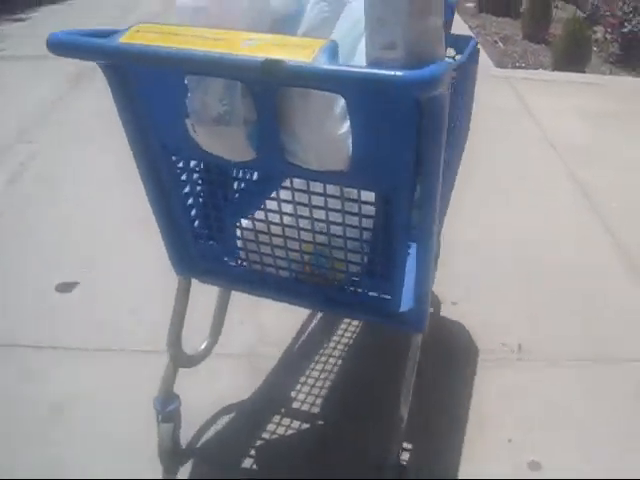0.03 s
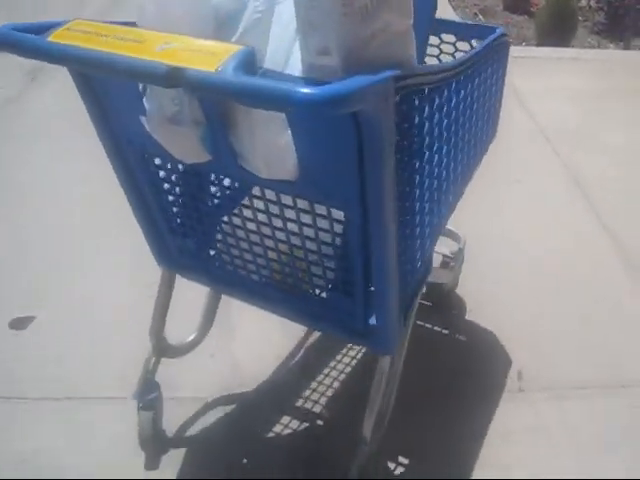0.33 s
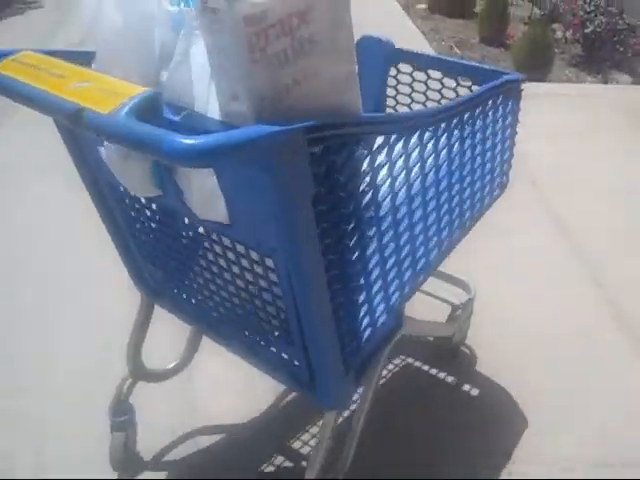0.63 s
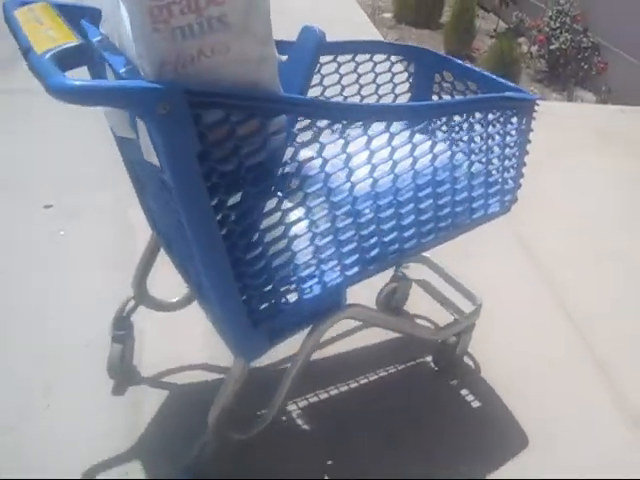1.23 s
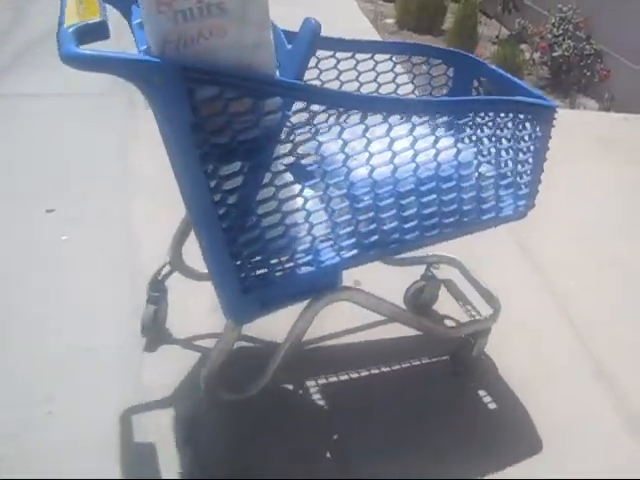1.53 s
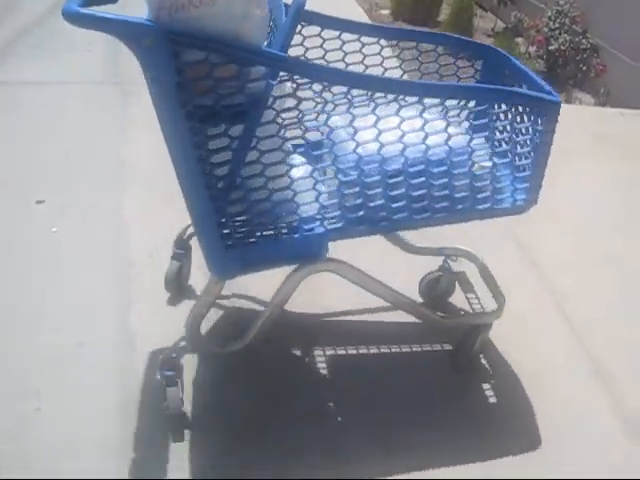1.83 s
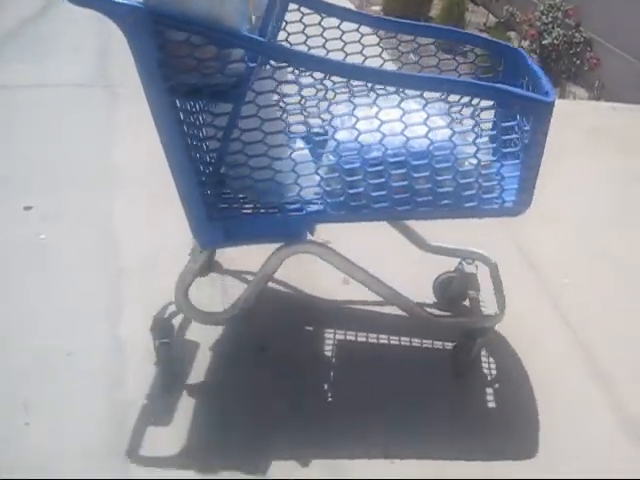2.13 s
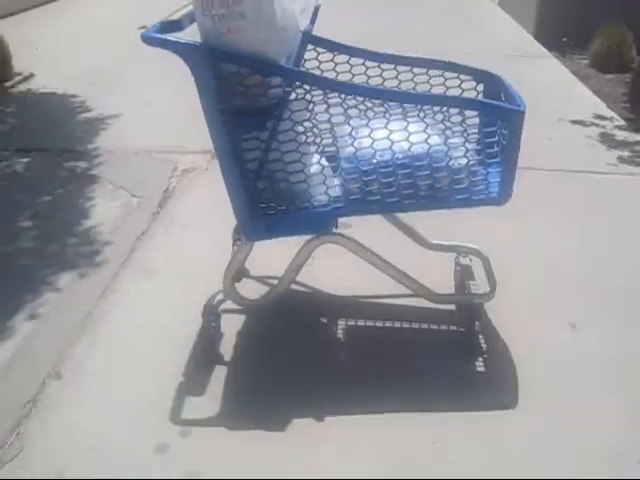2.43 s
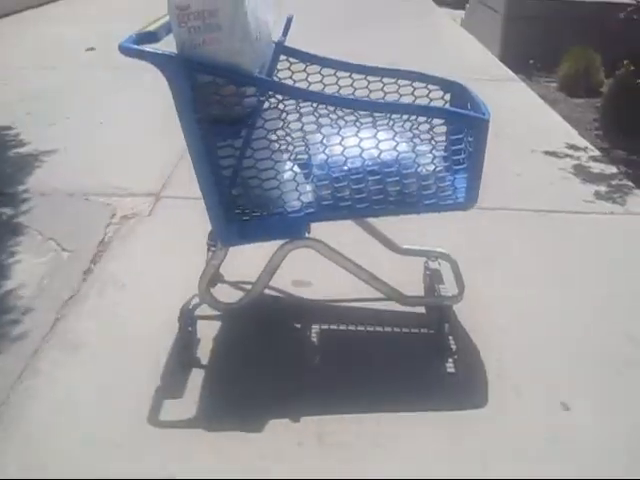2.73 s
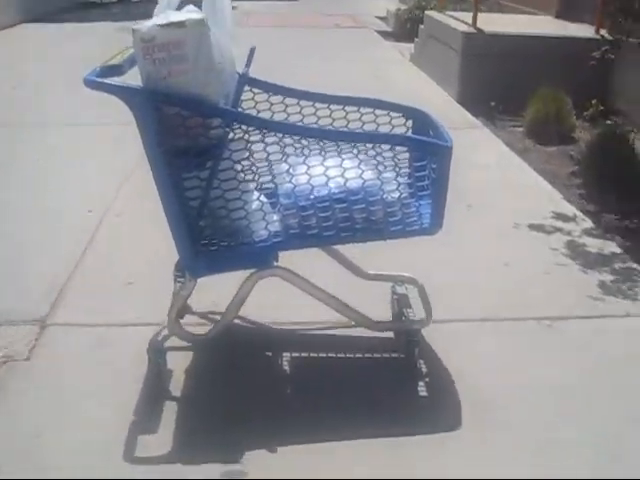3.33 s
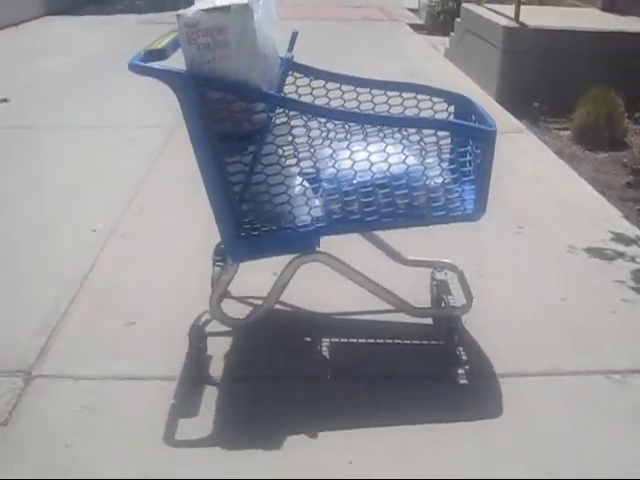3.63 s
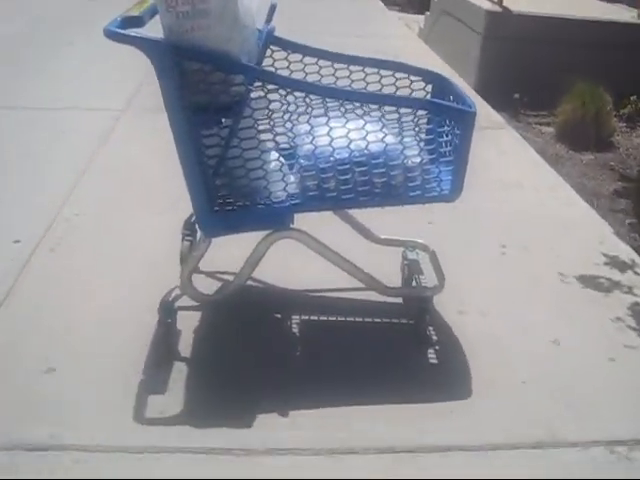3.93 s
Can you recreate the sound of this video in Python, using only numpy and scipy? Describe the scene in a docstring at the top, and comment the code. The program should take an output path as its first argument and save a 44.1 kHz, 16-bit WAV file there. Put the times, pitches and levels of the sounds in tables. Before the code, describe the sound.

Steady distant traffic outdoors, with a few brief handling bumps, rubs and clicks.

```python
"""Fingers rub, tick and knock on the plastic case of a hand-held camera, outdoors by a parked cart.
Rubs are slip grains over hiss, ticks short noise bursts, knocks damped case modes. A small hard object
clinks; nearby walls echo these close sounds. Light wind and soft bumps reach the single microphone.
Behind: a wash of distant traffic and the hum of building machinery.
The sound cuts out briefly and resumes at a quieter, duller spot."""
import sys
import numpy as np
from scipy import signal
from scipy.fft import rfft, irfft, next_fast_len
from scipy.io import wavfile
from scipy.ndimage import uniform_filter1d, map_coordinates

SR = 44100
rng = np.random.default_rng(int(sys.argv[2]) if len(sys.argv) > 2 else 0)


def transcribe(signal):
    """Save signal, clipped to [-1, 1], as a 16-bit WAV file at the path in sys.argv[1]."""
    frames = np.atleast_2d(signal).T
    limited = np.clip(frames, -1, 1)
    pcm = np.round(limited * 32767).astype(np.int16)
    wavfile.write(sys.argv[1], SR, pcm)


N = 176400

CUT_S, RESUME_S, TOP_HZ = 2.402, 2.5345, 15850
HUM_DRIFT_RAD, HUM_WAVER_DB = 0.35, 2
BUMP_DECAY_CYCLES = 0.63  # to 1/e
WALL_DB, WALL_T60_S, WALL_DELAY_S = -11, 0.16, 0.005
CRACK_DB, CRACK_T60_S = -11, 0.035
GRAINS_PER_S, GRAIN_POWER_SHARE = 1500, 0.48
TICK_ATTACK_S, TICK_T60_S = 0.00049, 0.023

# traffic spectrum, per spot: f/Hz, relative density/dB
TRAFFIC_SPECTRUM_1 = [(15, -24.5), (45, -9.5), (80, -4), (140, -6.5), (230, -6), (330, -9.5), (480, -13.5),
                      (640, -15), (765, -16), (900, -13.5), (1890, -21.5), (2600, -22.5), (3090, -18.5),
                      (4500, -24), (5800, -30), (7400, -34), (9090, -40.5), (11100, -42.5), (15800, -50.5)]
TRAFFIC_SPECTRUM_2 = [(15, -26), (45, -14), (85, -4), (115, -7), (168, -5.5), (205, -9), (329, -9.5),
                      (403, -12), (490, -16), (680, -16.5), (900, -13.5), (1290, -18.5), (1730, -19.5),
                      (3100, -23), (4520, -26.5), (7000, -35), (10000, -45), (15800, -56)]
# traffic envelope, per spot: t/s, level/dB
TRAFFIC_LEVEL_1 = [(0, -27), (.3, -27.5), (.45, -28), (.9, -27.5), (1.1, -27.5), (1.9, -27.5), (2.4, -28)]
TRAFFIC_LEVEL_2 = [(2.53, -34), (2.85, -30.5), (3.15, -30.5), (3.35, -28.5), (3.55, -27), (3.75, -29.5),
                   (4, -31.5)]
# machinery tones, per spot: f/Hz, level/dB
HUM_TONES_1 = [(53.8, -38), (113, -37), (170, -49), (344.5, -47.5)]
HUM_TONES_2 = [(91.5, -43.5), (172.3, -45.5), (226.1, -40)]
# hum swell, first spot: t/s, gain/dB
HUM_SWELL_1 = [(0, -10), (.5, -4), (.8, 1), (1.3, 0.5), (2, 1), (2.35, 0.5)]
# wind envelope: t/s, level/dB
WIND_LEVEL = [(0, -51), (.28, -45), (.34, -29), (.42, -47), (.52, -35), (.68, -38), (.86, -30.5),
              (1.1, -42), (1.5, -42), (1.95, -45), (2.25, -34), (2.4, -35), (2.55, -52), (2.85, -45),
              (3.02, -37), (3.2, -40), (3.57, -37), (3.7, -48)]
# wind spectrum: f/Hz, relative density/dB
WIND_SPECTRUM = [(10, -30), (25, -6), (55, -0.5), (90, -0.5), (160, -12.5), (300, -23), (900, -68.5)]
# microphone bumps: t/s, level/dB, f/Hz
MIC_BUMPS = [(.311, -18.5, 75), (.334, -21.5, 150), (0.363, -21.5, 110), (.52, -11.5, 71),
             (.889, -14.5, 87.5), (.977, -16, 80), (2.311, -18.5, 55.2), (3.562, -21.5, 35),
             (3.594, -20.5, 45)]
# contacts of the hard object: t/s, level/dB
OBJECT_CONTACTS = [(.1418, -22.5), (3.6694, -9.5), (3.6708, -11), (3.6724, -12.5)]
# its modes: f/Hz, level/dB, t60/s
OBJECT_MODES = [(790, -28, .08), (1887, -22, .09), (3435, -3, .03), (3486, -4.5, 0.027), (3900, -19, .05),
                (4650, -20, 0.037), (5990, -26, .2), (6060, -18, .045), (6500, -28, .07), (8160, -31, .05)]
# finger rubs: peak t/s, rise/s, fall/s, level/dB, tilt/(dB/octave)
FINGER_RUBS = [(.085, 0.042, 0.058, -33, 0.5), (.146, .008, .012, -31, 1), (.62, .018, .025, -25.5, .5),
               (.655, .025, 0.0097, -25.5, 2), (.79, .006, .008, -40, 6), (1.157, .008, .01, -31, 0.5),
               (1.18, .012, .018, -26.5, -2), (2.39, 0.045, .02, -38.5, 2), (2.641, .006, 0.01, -33.5, -2),
               (2.668, .005, 0.009, -36, -1), (3.378, .009, .02, -27, -0.5),
               (3.418, 0.023, 0.027, -32, -0.5), (3.49, 0.026, 0.013, -32.5, -1),
               (3.535, 0.02, 0.016, -34, -2), (3.76, 0.02, 0.026, -34, 0), (3.797, 0.017, .012, -34, -3)]
# hissing skin slides: peak t/s, rise/s, fall/s, level/dB
SKIN_SLIDES = [(.594, .002, .003, -32), (.63, .025, .025, -29), (.657, 0.013, .011, -23.5),
               (.96, 0.034, .045, -46), (3.375, .008, .015, -43), (3.414, .006, .016, -44)]
# friction spectra: f/Hz, relative density/dB
RUB_SPECTRUM = [(100, -12), (500, -10.5), (900, -1.5), (1700, 0.5), (2300, -2.5), (3300, -1.5), (5000, -6),
                (7000, -9), (10000, -17.5), (15500, -28)]
SLIDE_SPECTRUM = [(300, -25.5), (1400, 1.5), (2000, -1), (2700, 11.5), (3800, -7.5), (7000, -5),
                  (11000, 0.5), (15500, -8.5)]
TICK_SPECTRUM = [(100, -12), (600, -7.5), (1200, 0), (1800, 4), (2700, -9.5), (3450, -1), (4800, -5.5),
                 (7200, -10), (10000, -22.5), (15500, -33)]
# case ticks: t/s, level/dB, tilt/(dB/octave)
CASE_TICKS = [(.0667, -27, 2), (0.1416, -24.5, 3), (.1525, -30, 6), (.6485, -17.5, 0), (0.655, -16.5, -0.5),
              (3.174, -26, -1), (3.193, -20, 0.5), (3.2126, -24.5, -3), (3.257, -24, 0), (3.4303, -19.5, 0),
              (3.4942, -19.5, 0.5), (3.7592, -30.5, 5.5), (3.809, -22, 0), (3.8118, -24, -1.5)]
# case knocks: t/s, level/dB, fingertip low-pass corner/Hz
CASE_KNOCKS = [(.1435, -16.5, 4000), (.147, -19.5, 2500), (.6565, -18.5, 2500), (1.1555, -19, 1200),
               (1.1745, -20, 3000), (1.179, -19, 2500), (3.372, -6.5, 800), (3.378, -12.5, 900),
               (3.7985, -16.5, 1200), (3.8115, -21, 3500)]
# hollow case modes: f/Hz, level/dB, t60/s
SHELL_MODES = [(710, -11, 0.022), (886, -9, 0.028), (1170, -11.5, 0.025), (1490, -4.5, 0.034),
               (1778, -5.5, 0.038), (2070, -5.5, 0.063), (3400, -8, .025)]


def amp(db):
    """Decibels to gain."""
    return 10 ** (np.asarray(db) / 20)


def unit_rms(x):
    """Scale to rms 1."""
    return x / np.sqrt(np.mean(x ** 2) + 1e-20)


def time_s():
    """Sample times."""
    return np.arange(N) / SR


def envelope_db(points):
    """Level at each sample, linear between points."""
    return np.interp(time_s(), *np.transpose(points))


def spectrum_db(points, hz):
    """Level at hz, interpolated on a log frequency axis."""
    knots_hz, db = np.transpose(points)
    return np.interp(np.log(hz + 1), np.log(knots_hz + 1), db)


def wobble(knots_per_s):
    """Smooth random curve."""
    return map_coordinates(rng.standard_normal(400), [time_s() * knots_per_s + 2], mode="wrap")


def filtered(x, response):
    """FFT filter with gain response(hz)."""
    size = next_fast_len(len(x) + 8192)
    return irfft(rfft(x, size) * response(np.fft.rfftfreq(size, 1 / SR)), size)[:len(x)]


def add(track, start_s, sound):
    """Mix sound into track from start_s."""
    start = round(start_s * SR)
    sound = sound[max(-start, 0):]
    part = track[max(start, 0):][:len(sound)]
    part += sound[:len(part)]


def traffic(spectrum, level, patch_db, sway_db):
    """Distant traffic: a noise wash with faint random patches in time and frequency."""
    bins = signal.stft(rng.standard_normal(N), nperseg=512)[2]
    patches = uniform_filter1d(rng.standard_normal(bins.shape), size=6, axis=0)
    patches = uniform_filter1d(patches, size=14, axis=1)
    noise = signal.istft(bins * amp(patch_db * unit_rms(patches)), nperseg=512)[1][:N]
    wash = unit_rms(filtered(noise, lambda hz: amp(spectrum_db(spectrum, hz))))
    return wash * amp(envelope_db(level) + sway_db * wobble(12))


def machinery(tones):
    """Fans and compressors: low tones, slightly unsteady in level and phase."""
    out = np.zeros(N)
    for hz, db in tones:
        peak = np.sqrt(2) * amp(db + HUM_WAVER_DB * wobble(5))
        out += peak * np.sin(2 * np.pi * hz * time_s() + HUM_DRIFT_RAD * wobble(5.99))
    return out


def wind():
    """Light gusts rumble on the microphone."""
    rumble = filtered(rng.standard_normal(N), lambda hz: amp(spectrum_db(WIND_SPECTRUM, hz)))
    return unit_rms(rumble) * amp(envelope_db(WIND_LEVEL))


def bumps():
    """Soft microphone bumps: one low, quickly damped swing each."""
    out, t = np.zeros(N), np.arange(SR // 4) / SR
    for start_s, db, hz in MIC_BUMPS:
        add(out, start_s, amp(db) * np.sin(2 * np.pi * hz * t) * np.exp(-hz * t / BUMP_DECAY_CYCLES))
    return out


def wall_echo(x):
    """Nearby walls return a short, diffuse tail."""
    t = np.arange(SR // 3) / SR
    tail = rng.standard_normal(len(t)) * amp(-60 * t / WALL_T60_S) * (t > WALL_DELAY_S)
    return signal.fftconvolve(x, tail / np.linalg.norm(tail))[:N]


def friction(spectrum, tilt_db_oct, size):
    """Tiny slips over hiss, shaped, tilted above 600 Hz; rms 1."""
    slips = (rng.random(size) < GRAINS_PER_S / SR) * rng.standard_normal(size)
    hiss = rng.standard_normal(size)
    force = np.sqrt(GRAIN_POWER_SHARE) * unit_rms(slips) + np.sqrt(1 - GRAIN_POWER_SHARE) * hiss
    octaves = lambda hz: np.log2(np.maximum(hz, 600) / 2000)
    return unit_rms(filtered(force, lambda hz: amp(spectrum_db(spectrum, hz) + tilt_db_oct * octaves(hz))))


def ring(modes, t):
    """Damped modes; levels vary per blow."""
    return sum(amp(db + rng.normal(0, 1) - 60 * t / t60_s) * np.sin(2 * np.pi * hz * t)
               for hz, db, t60_s in modes)


def clinks():
    """Small hard object: each contact cracks and rings its modes."""
    out, t = np.zeros(N), np.arange(SR // 3) / SR
    decay = amp(CRACK_DB - 60 * t / CRACK_T60_S)
    for start_s, db in OBJECT_CONTACTS:
        crack = decay * friction(TICK_SPECTRUM, tilt_db_oct=2.0, size=len(t))
        add(out, start_s, amp(db) * (ring(OBJECT_MODES, t) + crack))
    return out


def fingers():
    """Skin friction swells and fades as the grip shifts."""
    out, t = np.zeros(N), np.arange(-SR // 4, SR // 4) / SR
    stroke = lambda rise_s, fall_s: np.exp(-(t / np.where(t < 0, rise_s, fall_s)) ** 2)
    for peak_s, rise_s, fall_s, db, tilt_db_oct in FINGER_RUBS:
        rub = friction(RUB_SPECTRUM, tilt_db_oct, size=len(t))
        add(out, peak_s + t[0], amp(db) * stroke(rise_s, fall_s) * rub)
    for peak_s, rise_s, fall_s, db in SKIN_SLIDES:
        slide = friction(SLIDE_SPECTRUM, tilt_db_oct=0, size=len(t))
        add(out, peak_s + t[0], amp(db) * stroke(rise_s, fall_s) * slide)
    return out


def case():
    """The plastic case ticks under the grip and rings hollow; soft fingertips dull the knocks."""
    out, t = np.zeros(N), np.arange(SR // 4) / SR
    tick_shape = amp(-60 * t / TICK_T60_S) * (1 - np.exp(-t / TICK_ATTACK_S))
    for start_s, db, tilt_db_oct in CASE_TICKS:
        add(out, start_s, amp(db) * tick_shape * friction(TICK_SPECTRUM, tilt_db_oct, size=len(t)))
    for start_s, db, corner_hz in CASE_KNOCKS:
        knock = filtered(ring(SHELL_MODES, t), lambda hz: (1 + 1j * hz / corner_hz) ** -2)
        add(out, start_s, amp(db) * knock)
    return out


def scene():
    """Two backgrounds in turn, close sounds on top; dual mono."""
    spot_1 = traffic(TRAFFIC_SPECTRUM_1, TRAFFIC_LEVEL_1, patch_db=0.9, sway_db=-0.07)
    spot_1 += machinery(HUM_TONES_1) * amp(envelope_db(HUM_SWELL_1))
    spot_2 = traffic(TRAFFIC_SPECTRUM_2, TRAFFIC_LEVEL_2, patch_db=0.65, sway_db=1.24)
    spot_2 += machinery(HUM_TONES_2)
    background = np.where(time_s() < CUT_S, spot_1, spot_2)
    close = fingers() + case() + clinks()
    mono = background + close + amp(WALL_DB) * wall_echo(close) + bumps() + wind()
    return np.array([mono, mono])


def record(dry):
    """The camera stops and restarts once; nothing passes above TOP_HZ."""
    running = (time_s() < CUT_S) | (time_s() > RESUME_S)
    gate = uniform_filter1d(1.0 * running, size=32)
    return np.array([filtered(channel * gate, lambda hz: hz < TOP_HZ) for channel in dry])


dry = scene()
out = record(dry)
transcribe(out)
```